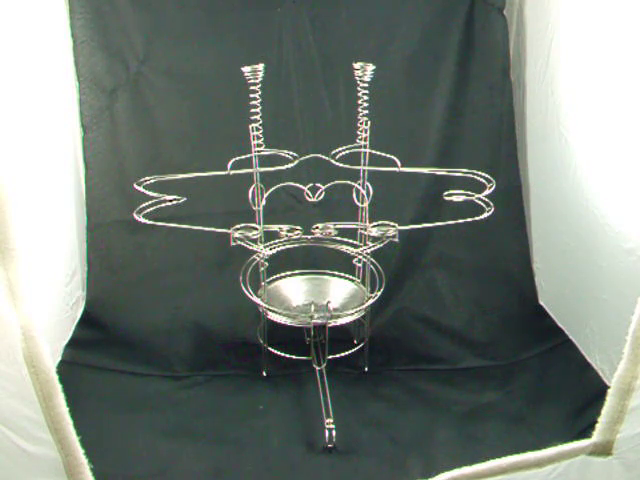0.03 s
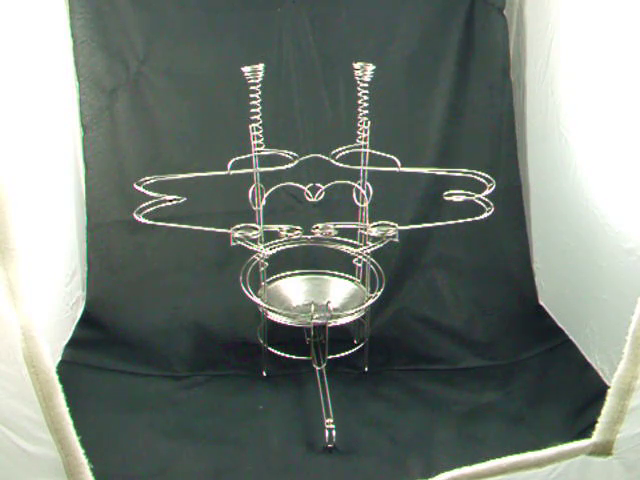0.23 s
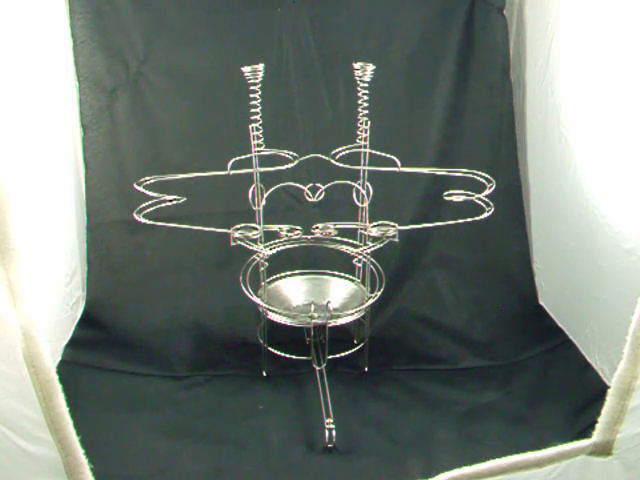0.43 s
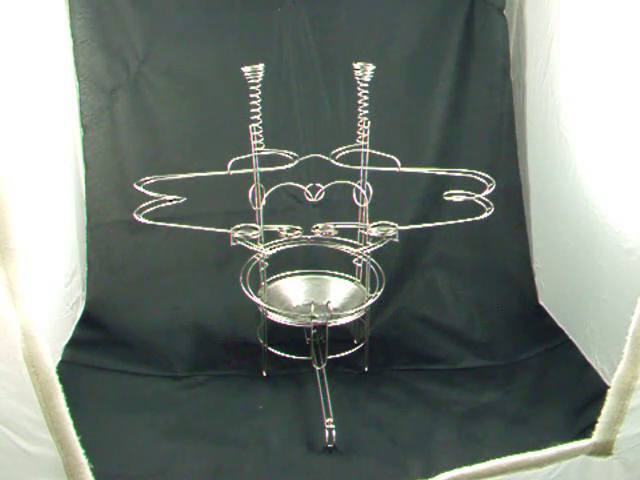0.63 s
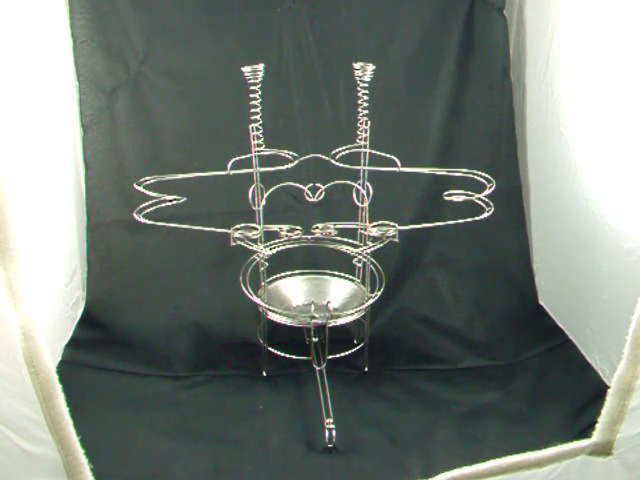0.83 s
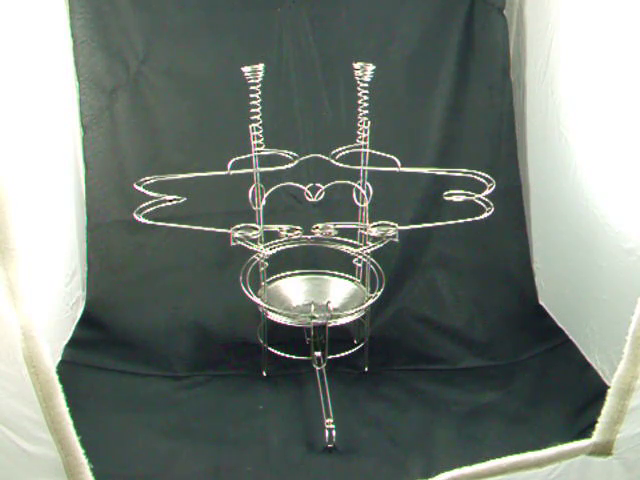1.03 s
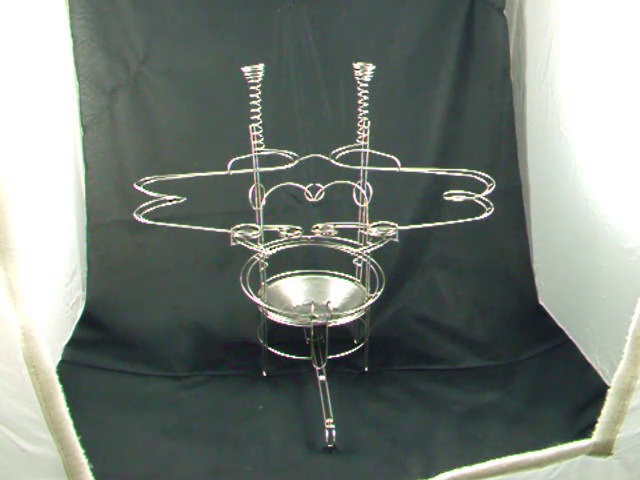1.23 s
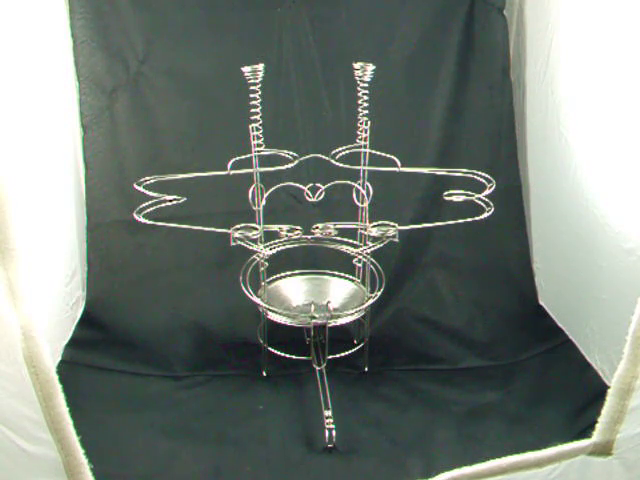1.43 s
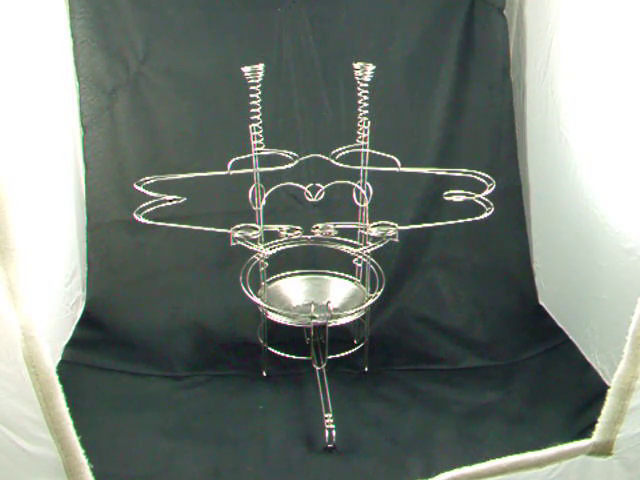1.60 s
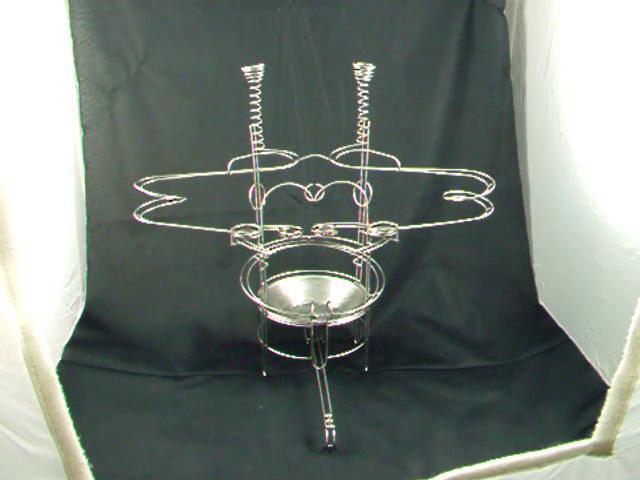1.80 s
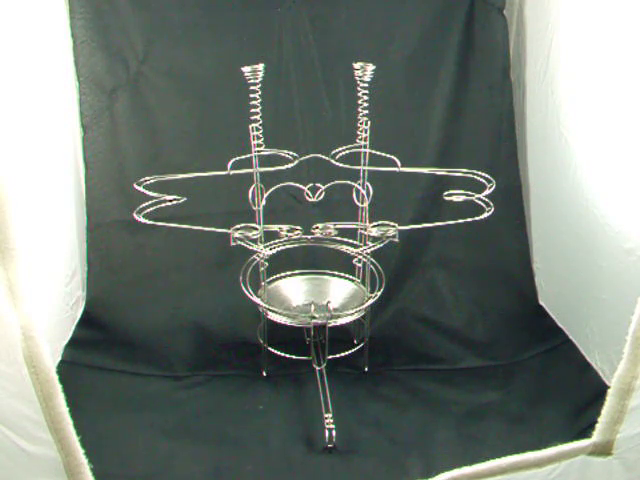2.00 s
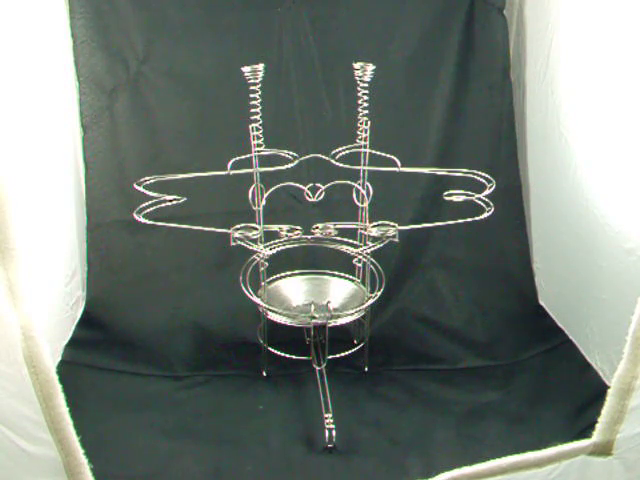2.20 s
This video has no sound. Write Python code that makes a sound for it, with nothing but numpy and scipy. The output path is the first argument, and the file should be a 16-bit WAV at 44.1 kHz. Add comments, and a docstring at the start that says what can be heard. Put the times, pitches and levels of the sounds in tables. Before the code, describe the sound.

Small steel balls rattle along a metal wire track. One chatters through bends, hits the frame with a ringing clink, rolls on more smoothly and clacks against a stop. A dull thump sounds on the close microphone over room hum.

```python
"""Small steel balls run down a welded wire track, close to a cheap microphone in a humming room.
Dense micro-impacts ring the rails. A ball chatters through the bends, strikes the frame with a
ringing clink, rolls on more smoothly, then clacks against a stop.
A dull low thump sounds on the microphone; after that the room sound dips and creeps back."""
import sys
import numpy as np
from scipy import signal
from scipy.fft import rfft, irfft
from scipy.io import wavfile
from scipy.ndimage import uniform_filter1d

SR = 44100
rng = np.random.default_rng(int(sys.argv[2]) if len(sys.argv) > 2 else 0)


def wrap_up_sound(samples):
    """Save the sound to the file named by the first command line argument, as 16-bit audio."""
    columns = np.atleast_2d(samples).T
    # keep every value between -1 and 1, then stretch to whole-number steps
    tamed = np.clip(columns, -1, 1)
    steps = np.round(tamed * 32767).astype(np.int16)
    wavfile.write(sys.argv[1], SR, steps)


N = 103635

GATE_RAMP_S = 0.012
# Weak wire modes of the lower run, spectrum: freq_hz, gain_db
LOWER_WIRE_SPECTRUM = [(1500, -6), (2100, -13), (2900, 0.5), (3500, 2), (3950, 5), (4250, 1.5),
                       (4600, -5.5), (5900, 2.5), (6600, -2.5), (7400, -1), (8250, -9), (8700, -26)]


def amp(db):
    """Decibels to gain."""
    return 10 ** (np.asarray(db) / 20)


def unit(x):
    """Scale to rms 1."""
    return x / np.sqrt(np.mean(x ** 2) + 1e-20)


def colour(spectrum, freq_hz):
    """Spectrum gain at freq_hz, interpolated in log frequency."""
    points_hz, gain_db = np.transpose(spectrum)
    return amp(np.interp(np.log(freq_hz + 1), np.log(points_hz), gain_db))


def level(curve):
    """Per-sample gain from (time_s, level_db) points."""
    return amp(np.interp(np.arange(N) / SR, *np.transpose(curve)))


def noise(spectrum):
    """Steady coloured noise, rms 1."""
    white = rfft(rng.standard_normal(N))
    return unit(irfft(white * colour(spectrum, np.fft.rfftfreq(N, 1 / SR)), N))


def gate(start_s, length_s):
    """Ramp up from start_s, ramp down length_s later."""
    t = np.arange(N) / SR - start_s
    return np.clip(t / GATE_RAMP_S, 0, 1) * np.clip(1 + (length_s - t) / GATE_RAMP_S, 0, 1)


def ring(modes, samples=26000):
    """Sum of decaying partials, energy 1."""
    t = np.arange(samples) / SR
    out = sum(amp(db) * np.exp(-np.log(1000) * t / t60_s) * np.sin(2 * np.pi * (hz * t + rng.random()))
              for hz, db, t60_s in modes)
    return out / np.linalg.norm(out)


def wire(spectrum, t60_s, count=240, samples=26000):
    """Weak bending modes of the wirework, scattered over the treble."""
    freqs_hz = 1400 + 7600 * (np.arange(count) + rng.random(count)) / count
    gains_db = 20 * np.log10(colour(spectrum, freqs_hz))
    return ring([(hz, db, t60_s) for hz, db in zip(freqs_hz, gains_db)], samples)


def excite(force, response):
    """Drive a ringing body with a force."""
    return signal.fftconvolve(force, response)[:N]


def placed(start_s, level_db, sound):
    """Start a sound at start_s, with level_db over its first 10 ms."""
    return np.pad(amp(level_db) * sound / np.std(sound[:441]), (round(start_s * SR), N))[:N]


def room():
    """Mains hum, faint whines and air noise, dipping after the thump; steady hiss on top."""
    # freq_hz, level_db
    tones = [(120, -47), (216, -57), (240, -56.5), (296, -63), (360, -62), (915, -64), (1117, -61),
             (1574, -58), (2030, -65.5)]
    # freq_hz, density_db
    air_spectrum = [(20, -25), (55, -7), (100, -9.5), (170, 1.5), (260, -2.5), (420, 0.5), (650, -7),
                    (900, -6.5), (1300, -14), (2000, -14), (4000, -16.5), (8000, -33.5)]
    hiss_spectrum = [(20, -3.5), (1500, 5), (3000, 1), (7200, 5), (8000, -1), (8700, -21)]
    # time_s, gain_db
    dip = [(0, -1), (1.5, 0), (1.53, -5.5), (1.8, -2.5), (2.1, -2.5), (2.35, 0)]
    t = np.arange(N) / SR
    hum = sum(amp(db) * unit(np.sin(2 * np.pi * (hz * t + rng.random()))) for hz, db in tones)
    air = amp(-48.5) * noise(air_spectrum)
    hiss = amp(-51) * noise(hiss_spectrum)
    return level(dip) * (hum + air) + hiss


def microphone_thump(time_s=1.509, pulse_s=0.00029, decay_s=0.0031):
    """A dull low thump on the microphone: a short pulse, then one heavily damped swing."""
    t = np.arange(N) / SR - time_s
    pulse = np.exp(-(t / pulse_s) ** 2)
    after_s = np.maximum(t, 0)
    onset = 1 - np.exp(-(after_s / (2 * pulse_s)) ** 2)
    swing = onset * np.exp(-after_s / decay_s) * (1 - after_s / decay_s)
    return amp(-24) * pulse - amp(-15) * swing


def strike(blows, modes, splash, tail, modes_db, splash_t60_s, tail_gain_db, tail_t60_s, build_s=0.0037):
    """Main modes build from the first blow; each blow adds a wire-mode splash and a longer tail."""
    main = ring(modes)
    build = 1 - np.exp(-np.arange(len(main)) / (build_s * SR))
    out = placed(blows[0][0], modes_db, main * build)
    for start_s, level_db in blows:
        out += placed(start_s, level_db, wire(splash, splash_t60_s, count=160, samples=9000))
        out += placed(start_s, level_db + tail_gain_db, wire(tail, tail_t60_s, count=100))
    return out


def clack():
    """The ball hits the stop and rebounds; the lower run rings on."""
    # start_s, level_db
    blows = [(1.5038, -38), (1.5048, -26.5), (1.5058, -29.5), (1.5085, -33), (1.5137, -38.5), (1.529, -38),
             (1.5405, -40.5), (1.576, -47.5)]
    # freq_hz, gain_db, t60_s
    stop_modes = [(3860, -7, .19), (3960, -8, .17), (5367, -14, .22), (5620, -8, .18), (5930, -5, .15),
                  (6200, 3, .11), (6438, -11, .15), (7030, -7, .1), (7429, -9, .2), (7975, -5, .1)]
    # freq_hz, gain_db
    stop_spectrum = [(1500, -21), (2300, -9), (2900, -8), (4000, -10), (4600, -15), (5300, -7), (6000, 9),
                     (7000, 5), (8100, 6), (8700, -27)]
    return strike(blows, stop_modes, splash=stop_spectrum, tail=LOWER_WIRE_SPECTRUM,
                  modes_db=-28.5, splash_t60_s=0.044, tail_gain_db=-12, tail_t60_s=0.36)


def clink():
    """Quick blows of the ball ring the frame."""
    # start_s, level_db
    blows = [(.6582, -24), (.6615, -33), (.6685, -27.5), (.673, -26), (.680, -31), (.686, -32)]
    # freq_hz, gain_db, t60_s
    frame_modes = [(2627, -10, .54), (2800, 3, .29), (2972, 0, .29), (3085, -6, .3), (3472, -7, .24),
                   (3806, -2, .27), (3935, -7, .3), (4716, -11, .41), (4813, -8, .3), (4936, -7, .24),
                   (5060, -10, .45), (5365, -10, .46), (6207, -12, .8), (7014, -9, .35), (7320, -6, .25),
                   (7535, -15, .5)]
    # freq_hz, gain_db
    frame_spectrum = [(1500, -16), (2000, -18), (2550, 0.5), (3000, 4), (3500, -2), (3950, 3.5), (4400, -6),
                      (5200, -9.5), (6300, 2), (6700, -8), (7100, 2.5), (7800, -11), (8300, -13),
                      (8800, -24.5)]
    return strike(blows, frame_modes, splash=frame_spectrum, tail=frame_spectrum,
                  modes_db=-22, splash_t60_s=0.12, tail_gain_db=-8, tail_t60_s=0.69)


def singing(t60_s=0.1):
    """The ball briefly drives a single rail note, which rings out."""
    # start_s, length_s, pitch_hz, drive_db
    notes = [(0.553, 0.0083, 5045, -28), (0.6, 0.023, 5040, -31.5), (1.036, 0.009, 3935, -37.5),
             (1.513, 0.0037, 3950, -24.5), (1.528, 0.0027, 4020, -33)]
    t = np.arange(N) / SR
    pole = np.exp(-np.log(1000) / (t60_s * SR))
    out = np.zeros(N)
    for start_s, length_s, pitch_hz, drive_db in notes:
        swell = signal.lfilter([1 - pole], [1, -pole], gate(start_s, length_s))
        out += amp(drive_db) * swell * unit(np.sin(2 * np.pi * pitch_hz * t))
    return out


def contacts(rate_per_s=2600, spread_db=2, surge_db=0.33, surge_s=0.0065):
    """Uneven micro-impacts of ball on wire, with slight surges, rms 1."""
    strength = amp(spread_db * np.minimum(rng.exponential(1, N), 3)) * rng.choice([-1, 1], N)
    surge = amp(surge_db * unit(uniform_filter1d(rng.standard_normal(N), round(surge_s * SR))))
    hits = rng.random(N) < rate_per_s / SR
    return unit(surge * strength * hits)


def rolling(wire_t60_s=0.075):
    """Micro-impacts ring the rails; in the bends they swell to chatter and a thin zing."""
    # Rubbing force, rough upper and smooth lower run: time_s, level_db
    upper_run = [(0, -40.5), (0.031, -44), (.115, -36.5), (0.189, -41), (0.224, -35), (.28, -42),
                 (0.346, -42.5), (.43, -38.5), (.5, -35.5), (0.559, -30), (0.616, -36.5), (0.647, -33)]
    lower_run = [(0.779, -40.5), (.88, -47), (.96, -49.5), (1.025, -53), (1.1, -47.5), (1.16, -42.5),
                 (1.195, -36.5), (1.225, -41), (1.29, -43.5), (1.37, -41.5), (1.41, -40), (1.46, -42.5),
                 (1.501, -39)]
    # start_s, length_s, chatter_db, zing_db
    bends = [(0.23, .026, -38, -51), (0.35, 0.023, -30, -38), (0.374, 0.0086, -25.5, -33),
             (0.452, 0.019, -38.5, -40), (0.48, 0.0086, -42, -37.5), (0.53, 0.0072, -32, -30.5),
             (0.569, 0.025, -32.5, -29), (0.591, 0.036, -41, -33.5)]
    # freq_hz, gain_db, t60_s
    upper_modes = [(2801, -0.5, 0.053), (2875, -2.5, 0.06), (2956, -3, 0.055), (3030, -3, 0.066),
                   (3110, -8, 0.045), (3470, -9.5, 0.12), (3960, -6.5, 0.062), (4090, -7, 0.11),
                   (5060, -9, 0.12), (5470, -22.5, 0.17), (6600, -31, .15), (7370, -10.5, 0.087)]
    lower_modes = [(2975, -7.5, 0.26), (3630, -3, 0.21), (3760, -1, 0.09), (3960, -0.5, 0.091),
                   (4080, 0.5, 0.087), (4690, -11.5, .25), (5040, -3.5, 0.36), (5368, -12.5, .35),
                   (5890, -3, .12), (5940, -2, 0.13), (7260, -6, .12)]
    zing_modes = [(7310, 0, .035), (7380, 0, .04), (7540, -12, .12), (7760, -14, .06), (8450, -22, .1),
                  (8630, -20, .1)]
    # freq_hz, gain_db
    upper_wire_spectrum = [(1500, -31), (2000, -29), (2350, -1.5), (2650, -8), (2850, 6.5), (3300, 0),
                           (4050, 0), (4400, -10.5), (5900, -6), (6900, -14.5), (7600, -16.5),
                           (8700, -31.5)]
    chatter = sum(amp(db) * gate(start_s, length_s) for start_s, length_s, db, _ in bends)
    zing_drive = sum(amp(db) * gate(start_s, length_s) for start_s, length_s, _, db in bends)
    upper_drive = level(upper_run) * gate(-GATE_RAMP_S, upper_run[-1][0]) + chatter
    lower_start_s, lower_end_s = lower_run[0][0], lower_run[-1][0]
    lower_drive = level(lower_run) * gate(lower_start_s, lower_end_s - lower_start_s)
    upper = excite(upper_drive * contacts(),
                   amp(-2) * wire(upper_wire_spectrum, wire_t60_s) + amp(-3) * ring(upper_modes))
    lower = excite(lower_drive * contacts(),
                   amp(-0.5) * wire(LOWER_WIRE_SPECTRUM, wire_t60_s) + amp(-3.5) * ring(lower_modes))
    zing = excite(zing_drive * contacts(), ring(zing_modes))
    return upper + lower + zing


def scene():
    """All sources, mono."""
    return (clink() + clack() + rolling() + singing() + microphone_thump() + room())[None]


def record(dry):
    """The recorder's steep low-pass."""
    cutoff_hz = 8850
    lowpass = signal.firwin(255, cutoff_hz, window=("kaiser", 7), fs=SR)
    return signal.oaconvolve(dry, lowpass[None], "same")


dry = scene()
out = record(dry)
wrap_up_sound(out)
```